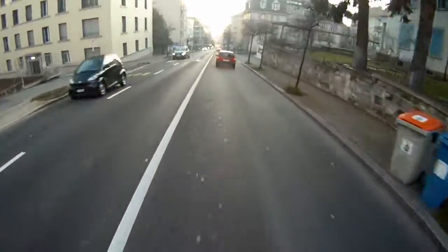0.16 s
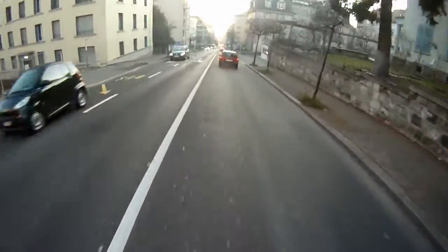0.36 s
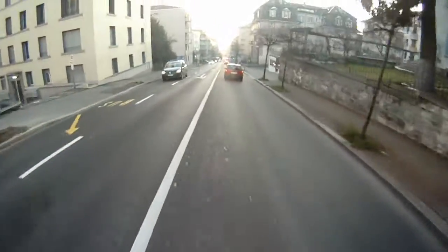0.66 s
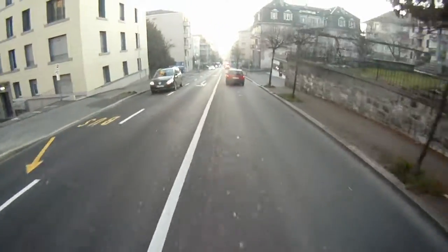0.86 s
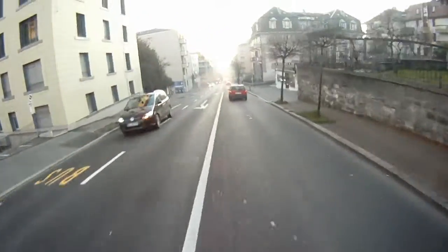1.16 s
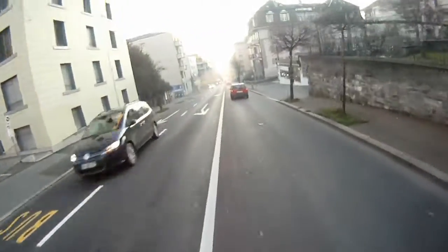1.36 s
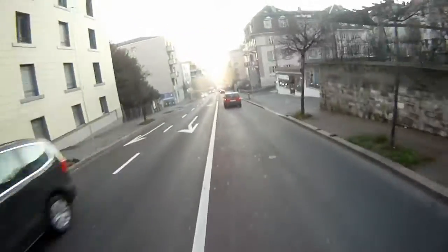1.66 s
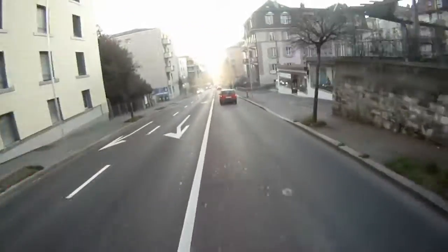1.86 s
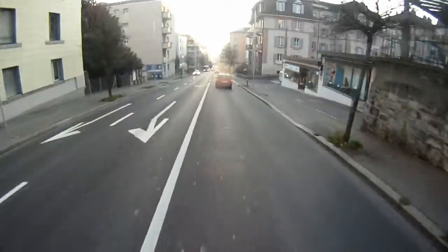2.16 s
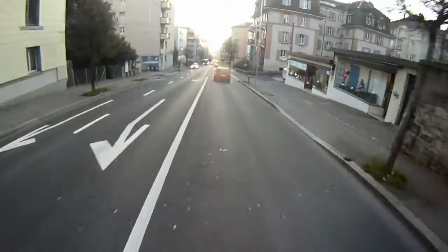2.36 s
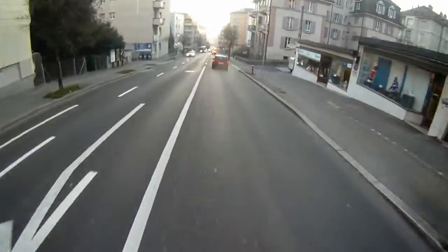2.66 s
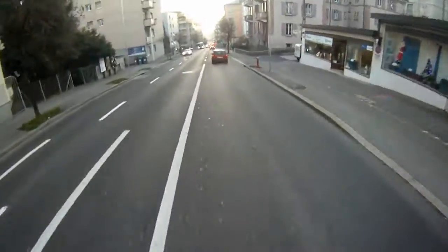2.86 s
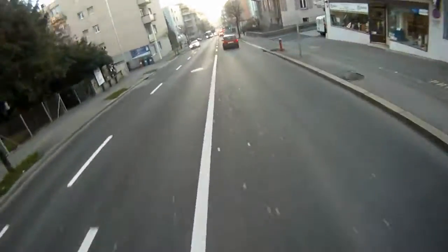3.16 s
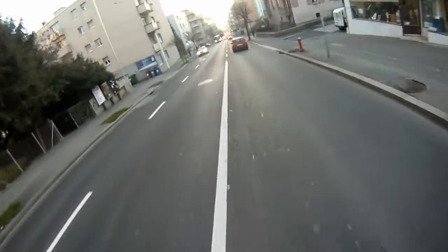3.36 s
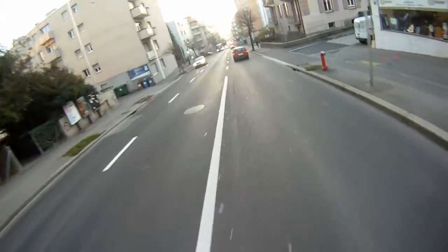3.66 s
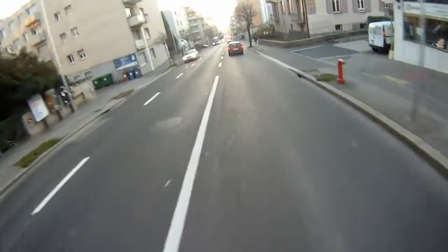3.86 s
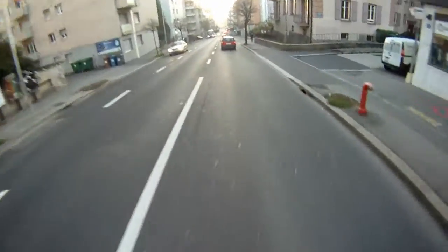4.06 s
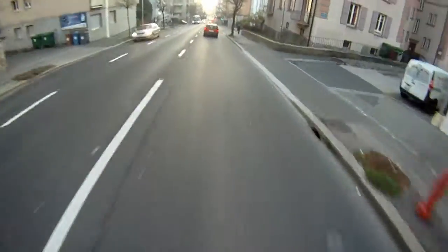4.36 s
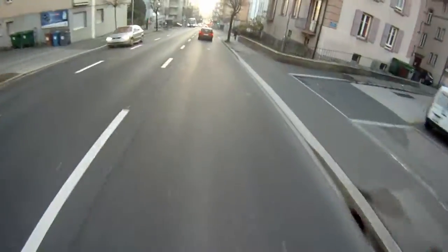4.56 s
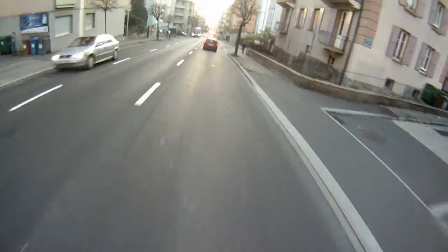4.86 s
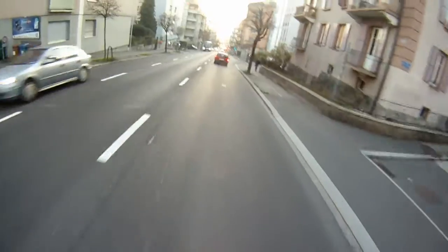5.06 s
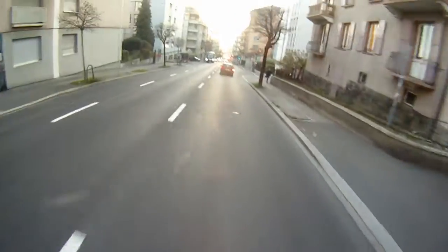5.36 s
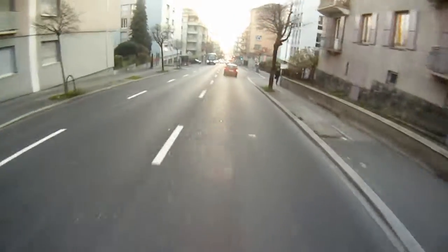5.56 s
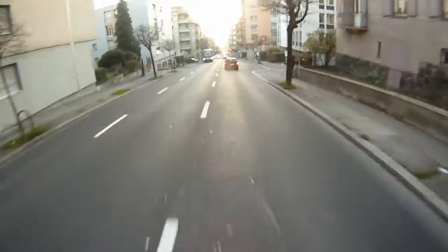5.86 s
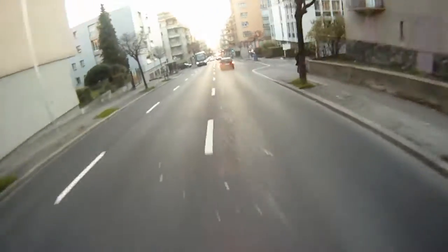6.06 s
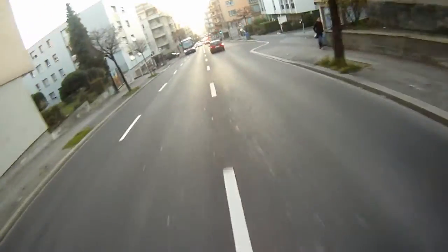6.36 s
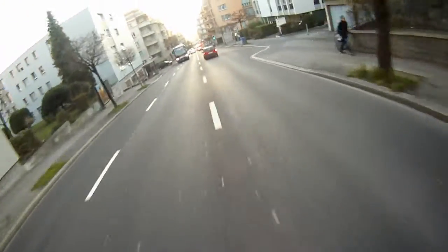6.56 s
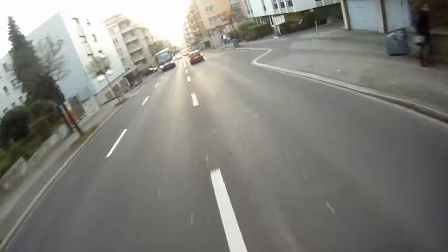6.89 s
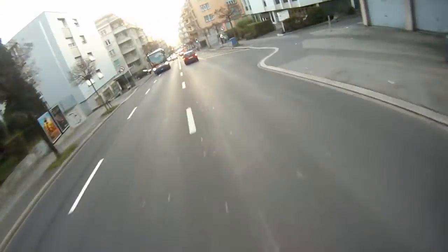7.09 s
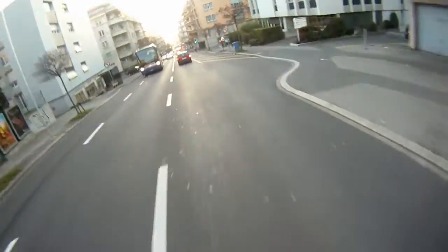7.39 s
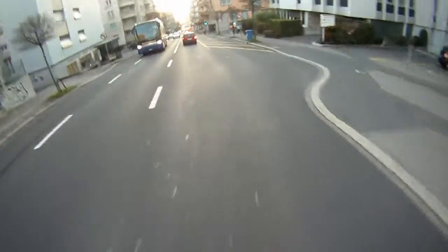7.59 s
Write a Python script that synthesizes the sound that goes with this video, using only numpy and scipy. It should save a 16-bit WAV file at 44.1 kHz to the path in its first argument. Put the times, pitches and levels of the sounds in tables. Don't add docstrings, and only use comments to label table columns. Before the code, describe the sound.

Fast skating down a city street: low wind roar, hard popping gusts, grainy wheel hiss, passing tyre noise, and sharp plastic clicks.

```python
import sys
import numpy as np
from scipy import signal
from scipy.fft import rfft, irfft, next_fast_len
from scipy.io import wavfile
from scipy.ndimage import uniform_filter1d

SR = 44100
rng = np.random.default_rng(int(sys.argv[2]) if len(sys.argv) > 2 else 0)


def volts_from_decibels(level):
    exponent = np.asarray(level, float) / 20
    return 10 ** exponent


def transcribe(signal):
    frames = np.atleast_2d(signal).T
    limited = np.clip(frames, -1, 1)
    pcm = np.round(limited * 32767).astype(np.int16)
    wavfile.write(sys.argv[1], SR, pcm)


N = 340893

# (time [s], peak [dB], gain drop [dB], width [ms])
HARD_GUSTS = [(0.448, -9, -0.5, 2.7), (0.522, -6, 3.5, 2.2), (0.644, -2, 0.5, 3), (0.81, 0, 4, 2.6),
              (0.989, -6, 5.5, 3.6), (1.78, -5, 3.5, 2.8), (2.807, 1, 3, 1.9), (3.063, -2, 1.5, 3.2),
              (3.101, -4.5, 3.5, 9.4), (3.207, 4.5, 4, 2.5), (3.348, 7.5, 25.5, 3.25), (3.639, -2, 4, 4.2),
              (3.767, -5, 0.5, 3), (4.517, -2.5, 6.5, 6.2), (4.595, 0.5, 14.5, 3.2), (4.846, 3, 18.5, 2.8),
              (5.228, 0.5, 5.5, 3.6), (5.367, 2.5, 3, 2.9), (5.576, -3, 1.5, 2.7), (6.312, -4.5, 6.5, 4.4),
              (6.714, -5, 2, 3.9), (6.822, 5.5, 7.5, 2.5), (7.294, 1, 0.5, 2.6), (7.5, -1, 4, 2.8),
              (7.522, -3, 2, 3.6), (7.561, 0.5, 13.5, 3.4), (7.674, 5, 10, 2.5)]
# (time [s], peak [dB], gain drop [dB], width [ms])
SUCTIONS = [
    (2.896, -5, 1.5, 2.5),
    (3.733, -2, 6, 3.5),
    (4.455, -7, 1, 4),
    (6.745, -3, 5, 4),
    (6.985, -6, 2, 3),
    (7.166, -3, 2.5, 2.5),
]


def evened(x):
    return x / np.sqrt(np.mean(x ** 2) + 1e-20)


def curve(rows, axis):
    rows = np.asarray(rows)
    return np.interp(np.arange(N) / SR, rows[:, 0], rows[:, axis])


def coloured(x, points):
    hz, db = np.transpose(points)
    size = next_fast_len(N)
    log_hz = np.log(np.fft.rfftfreq(size, 1 / SR) + 1)
    gain = volts_from_decibels(np.interp(log_hz, np.log(hz + 1), db))
    return evened(irfft(rfft(x, size) * gain, size)[:N])


def flicker(hz):
    r = np.exp(-2 * np.pi * hz / SR)
    smoother = np.convolve([1, -r], [1, -r])
    return evened(signal.lfilter([1], smoother, rng.standard_normal(N)))


def impulses(per_s, spread_db):
    sizes = volts_from_decibels(spread_db * np.minimum(rng.exponential(1, N), 4))
    return sizes * (rng.random(N) < per_s / SR)


def ring(x, hz, t60):
    r = 1000 ** (-1 / (max(t60, .002) * SR))
    w = 2 * np.pi * hz / SR
    return signal.lfilter([0, r * np.sin(w)], [1, -2 * r * np.cos(w), r * r], x)


def add(mix, s, sound):
    part = mix[max(round(s * SR), 0):][:len(sound)]
    part += sound[:len(part)]


def wind():
    # (time [s], airflow at the port [dB], roar relative to buffet [dB])
    airflow = [(0.0, -19.5, -5), (0.23, -25.5, 0), (0.57, -15, -10), (0.95, -16, -5.5), (1.61, -21.5, -2),
               (1.77, -16.5, -5.5), (2.11, -22, -0.5), (2.73, -18, -4.5), (3.21, -17, -5),
               (3.55, -16, -6.5), (4.22, -18.5, -4), (4.69, -17, -5.5), (5.12, -17.5, -4), (5.73, -22, 1),
               (6.67, -15.5, -3), (7.04, -19.5, -0.5), (7.45, -12.5, -6), (7.73, -18, -10.5)]
    # (frequency [Hz], level per Hz [dB])
    buffet_tone = [(12, -44), (20, -2), (43, -4), (81, -1), (300, -16), (390, -23), (660, -120)]
    # (frequency [Hz], level per Hz [dB])
    roar_tone = [(60, -25), (150, -1.5), (250, -4), (520, -3.5), (770, -15), (1000, -25), (1500, -33),
                 (3000, -60)]
    direction = np.where(rng.random(N) < .2, -1, 1)
    eddies = evened(impulses(per_s=330, spread_db=2.0) * direction)
    turbulence = flicker(hz=22.6)
    buffet = coloured(0.89 * eddies + rng.standard_normal(N), buffet_tone)
    buffet = evened(buffet * volts_from_decibels(1.4 * turbulence))
    roar = coloured(0.5 * eddies + rng.standard_normal(N), roar_tone)
    roar = evened(roar * volts_from_decibels(1.02 * turbulence + 0.12 * flicker(hz=61)))
    return volts_from_decibels(curve(airflow, axis=1)) * (buffet + volts_from_decibels(curve(airflow, axis=2)) * roar)


def road():
    # (time [s], rolling hiss level [dB], tilt of the hiss towards its low part [dB])
    rolling = [(0.0, -41, 4.5), (0.41, -40.5, 5), (0.71, -37.5, 1.5), (1.35, -35.5, 0.5),
               (1.77, -35.5, 0.5), (2.52, -36, -3), (3.16, -35.5, -0.5), (3.31, -39, -1.5),
               (3.7, -39, -1.5), (4.17, -38, -1), (4.5, -39, -3.5), (4.93, -39.5, -1.5),
               (5.38, -38.5, -0.3), (5.81, -36.5, -1.5), (6.61, -36, -2), (6.78, -38, -3.5),
               (7.3, -36, -1.5), (7.6, -42.5, -2)]
    # (frequency [Hz], level per Hz [dB])
    roll_tone = [(530, -6), (900, -4.5), (1130, -6), (1390, -4), (1700, -7), (2210, -2), (2550, -5),
                 (2980, -1.5), (3450, -9.5), (3800, -9), (3980, -18), (5000, -21.5), (6500, -38),
                 (11000, -120)]
    # (frequency [Hz], level per Hz [dB])
    spray_tone = [(3000, -30), (4000, -2), (4900, 0), (5500, -3.5), (6000, -15), (7000, -60)]
    # (time of closest point [s], spray rise [dB], half length [s])
    passes = [
        (2.04, 11.5, .17),
        (3.6, 3, .1),
        (5.85, 3.5, .2),
        (6.5, 2.5, .25),
        (7.3, 2.5, .2),
    ]
    roll_mean_db, spray_under_db = -35, -15
    spray_slope = 0.86
    pass_roll_share = 0.39

    surface_db = 0.79 * flicker(hz=10.6) + 0.69 * flicker(hz=90)
    grit = impulses(per_s=1500, spread_db=2.5) * rng.choice([-1., 1.], N)
    roll = coloured(0.39 * evened(grit) + rng.standard_normal(N), roll_tone)
    low = signal.sosfiltfilt(signal.butter(2, 2500, fs=SR, output="sos"), roll)
    tilt = volts_from_decibels(curve(rolling, axis=2))
    roll = low * tilt + (roll - low) / tilt
    spray = coloured(rng.standard_normal(N), spray_tone)

    t = np.arange(N) / SR
    near_db = sum(db / (1 + ((t - s) / half) ** 4) for s, db, half in passes)
    roll_db = curve(rolling, axis=1)
    spray_db = roll_mean_db + spray_under_db + spray_slope * (roll_db - roll_mean_db)
    roll = volts_from_decibels(roll_db + pass_roll_share * near_db + 4.0) * roll
    spray = volts_from_decibels(spray_db + near_db) * spray
    return volts_from_decibels(surface_db) * (roll + spray)


def gain_control(x):
    drop_db, t = np.zeros(N), np.arange(SR // 2) / SR
    recovery = 0.71 * np.exp(-t / 0.086) + 0.13 * np.exp(-t / 0.053)
    dip = (1 - np.exp(-t / 0.0044)) * recovery
    for s, _, db, _ in HARD_GUSTS + SUCTIONS:
        add(drop_db, s, db * dip)
    x = x * volts_from_decibels(-drop_db)
    power_db = 10 * np.log10(uniform_filter1d(x ** 2, size=260).clip(1e-9))
    fall_db = np.arange(N) * 130.0 / SR
    held_db = np.maximum.accumulate(power_db + fall_db) - fall_db
    over_db = np.maximum(held_db + 10.5, 0)
    return x * volts_from_decibels(-.6 * uniform_filter1d(over_db, size=130))


def knock(db, hz, ms):
    t = np.arange(1200) / SR * 1000
    contact = np.minimum(t / (0.23 * ms), 1) * (t < 1.6 * ms)
    drive = np.sin(2 * np.pi * hz * t / 1000) + 1.2 * rng.standard_normal(len(t))
    hollow = ring(contact * drive, hz, t60=0.018)
    hollow = signal.sosfilt(signal.butter(4, 4600, fs=SR, output="sos"), hollow)
    return volts_from_decibels(db) * hollow / abs(hollow).max()


def crack(db, ms, low_db, top_db, tail_db):
    # (frequency [Hz], level [dB], time to fade by 60 dB [s])
    wall_modes = [(1130, 5, 0.0071), (1650, 4.5, 0.0026), (2100, 5.5, 0.005), (2420, 12.5, 0.0084),
                  (2870, -10.5, 0.0056), (3680, -15, 0.0021), (4240, -7.5, 0.0058)]
    t = np.arange(2000) / SR * 1000
    pressure = np.exp(-(t / ms) ** 2) + volts_from_decibels(tail_db) * np.exp(-(t / 13.0) ** 2)
    slips = np.minimum(t / .5, 1) * pressure * rng.standard_normal(len(t))
    walls = np.zeros(len(t))
    for hz, level_db, t60 in wall_modes:
        share_db = np.interp(hz, [1400, 2400, 4300], [low_db, 0, top_db])
        walls += volts_from_decibels(level_db + share_db) * ring(slips, hz, t60)
    walls = signal.sosfilt(signal.butter(12, 4700, fs=SR, output="sos"), walls)
    return volts_from_decibels(db + 1.5) * walls / abs(walls).max()


def mount():
    # (time [s], hollow peak [dB], wall crack peak [dB], brightness [dB])
    strikes = [(0.1932, -12.5, -17, 9), (0.2594, -14, -19, 7), (0.572, -25, -26, 2),
               (1.0038, -21, -18.5, -1), (1.0642, -16, -19.5, 0.1), (1.3917, -18.5, -15.5, -8),
               (1.8951, -18, -18, 7), (2.131, -21, -16, 3), (2.4199, -15, -12, 1), (2.442, -26, -18, 0.1),
               (2.5012, -19.5, -15.5, 7), (2.6445, -18, -26, 0.1), (2.9508, -20, -15, -5),
               (3.0814, -29, -17.5, -17), (3.321, -27, -23, -5), (3.839, -23, -21.5, -6),
               (4.359, -27, -24, 0.1), (4.805, -19.5, -14.5, -6), (4.874, -26.5, -25, 5),
               (5.005, -22, -17, -10), (5.114, -17.5, -19, -7), (5.1982, -17, -18, -7),
               (5.3266, -29, -12, -18), (5.3605, -20, -18, 0.1), (5.4873, -13, -13, 2),
               (5.894, -16, -19, 7), (6.0439, -5, -9, -3), (6.139, -20, -18, -1), (6.8049, -19, -17.5, 13),
               (6.8712, -13, -11.5, -3)]
    # (time [s], peak [dB], brightness [dB])
    wall_slips = [(0.0094, -21.5, 12), (0.197, -19, 0.1), (1.8138, -25, 6), (2.959, -9, -9),
                  (3.3274, -20.5, 5), (4.586, -26, 4), (5.0755, -22, 0.1), (5.2966, -8.5, -8),
                  (5.301, -13, -8), (5.3674, -22, -6), (5.4974, -20, 0.1), (5.5209, -26, -33),
                  (5.917, -16, 2.5), (6.243, -20.5, 4), (6.8784, -19, -2.5)]
    # (time [s], peak [dB])
    touches = [(0.9832, -37), (1.1094, -25), (1.1513, -26), (1.7414, -21), (1.955, -29), (1.978, -20),
               (2.1615, -27), (2.4628, -32), (2.672, -14), (2.773, -24.5), (3.02, -27), (3.0744, -26),
               (4.0856, -31), (4.338, -22), (4.5625, -24), (5.0407, -22), (5.0769, -23), (5.2996, -16),
               (5.4141, -29), (5.663, -20), (5.9153, -21), (5.9748, -22), (6.0766, -23), (6.1594, -22),
               (6.2432, -24), (6.364, -20.5), (7.011, -28), (7.6532, -33), (7.7014, -34)]
    # (time [s], peak [dB])
    bounces = [(0.0094, -25), (1.0211, -25), (1.4014, -28), (1.7544, -31), (1.7714, -28), (2.5083, -20),
               (2.9644, -24), (3.327, -24), (5.3104, -24), (5.336, -26), (5.342, -21), (5.3684, -27),
               (5.5044, -22), (5.513, -26), (5.5214, -27), (6.1823, -25)]
    out = np.zeros(N)
    for s, db, *_ in strikes + touches + bounces:
        hollow_hz = 1338 + 30 * rng.uniform(-0.67, 1)
        add(out, s - .001, knock(db, hollow_hz, ms=2.0))
    for s, *_, db, bright_db in strikes + wall_slips:
        burst = crack(db, ms=2.63, low_db=-1.1 * bright_db, top_db=bright_db, tail_db=-13)
        add(out, s - .0015, burst)
    shakes = impulses(per_s=90, spread_db=2.0)
    rattle = evened(ring(shakes, hz=1340, t60=0.035)) + 0.39 * evened(ring(shakes, hz=2630, t60=0.0034))
    return out + volts_from_decibels(-60) * rattle


def gusts():
    out, t = np.zeros(N), np.arange(-600, 1400) / SR * 1000
    sided = [(row, 1) for row in HARD_GUSTS] + [(row, -1) for row in SUCTIONS]
    for (s, db, _, ms), side in sided:
        push = np.exp(-.5 * (t / (0.4 * ms)) ** 2)
        suction = 0.15 * np.exp(-.5 * ((t + 0.83 * ms) / (0.11 * ms)) ** 2)
        rebound = 0.14 * np.exp(-.5 * ((t - 0.58 * ms) / (1.7 * ms)) ** 2)
        add(out, s - 600 / SR, side * volts_from_decibels(db - 3.5) * (push - suction - rebound))
    return out


def scene():
    return (gain_control(wind() + road()) + gusts() + mount())[None]


def top_cut(x):
    return signal.sosfilt(signal.butter(12, 16620, fs=SR, output="sos"), x)


def record(dry):
    stored_hz, step_hz = 12000, 48000
    limited = np.clip(dry, -.94, .94)
    stored = signal.resample(limited, N * stored_hz // SR, axis=1)
    stored = stored + volts_from_decibels(-72) * rng.standard_normal(stored.shape)
    steps = np.repeat(stored, step_hz // stored_hz, axis=1)
    played = signal.resample(steps, N, axis=1)
    edge = signal.firwin(901, 15270, window=("kaiser", 1.5), fs=SR)
    mix = signal.oaconvolve(played, edge[None], "same")
    return top_cut(mix)


dry = scene()
out = record(dry)
transcribe(out)
```